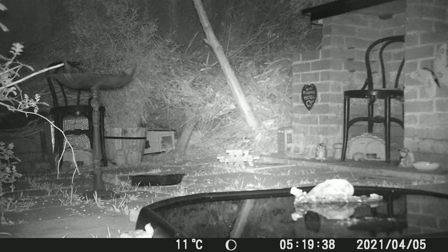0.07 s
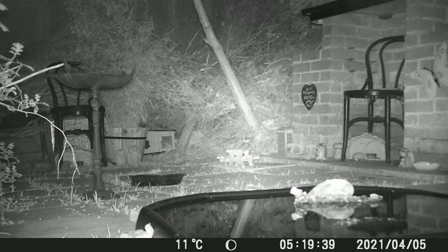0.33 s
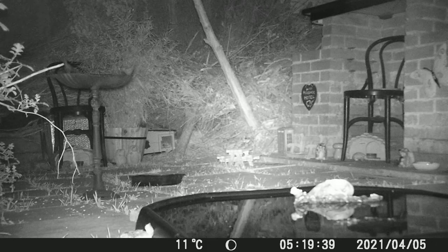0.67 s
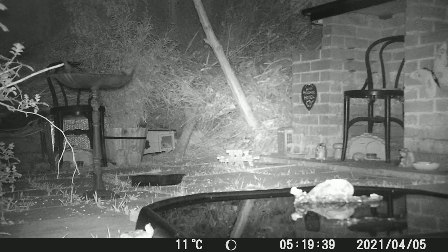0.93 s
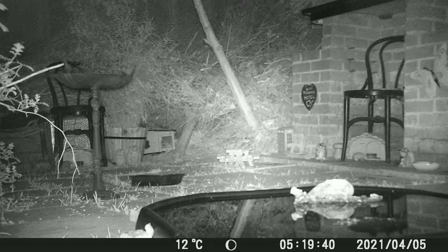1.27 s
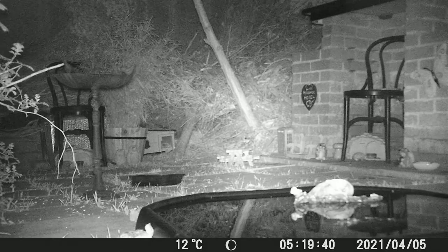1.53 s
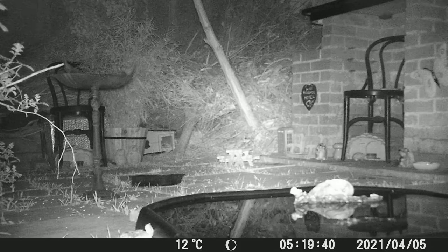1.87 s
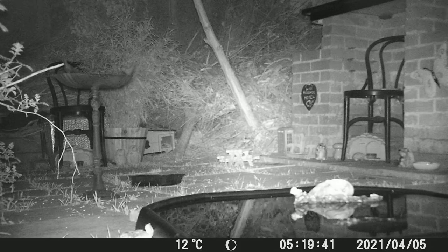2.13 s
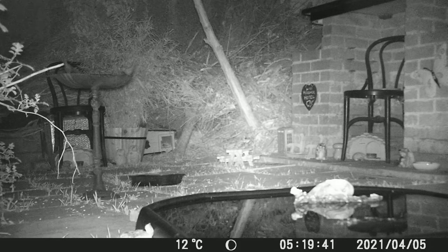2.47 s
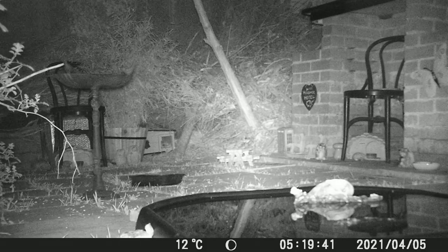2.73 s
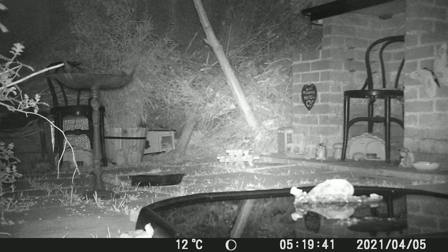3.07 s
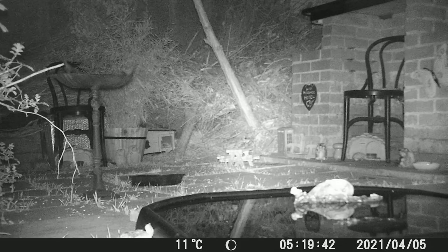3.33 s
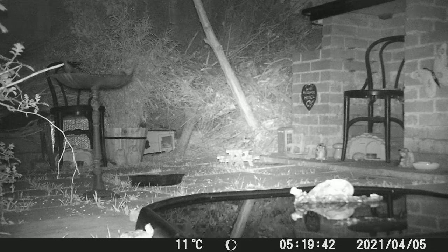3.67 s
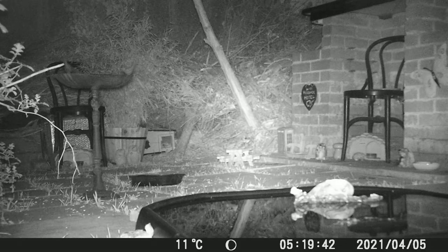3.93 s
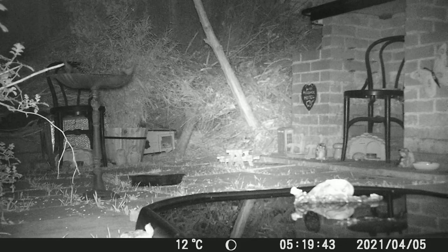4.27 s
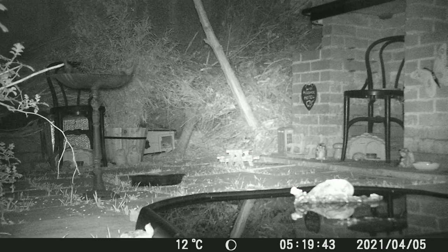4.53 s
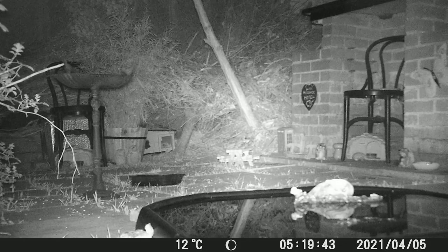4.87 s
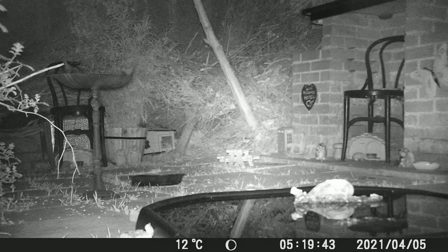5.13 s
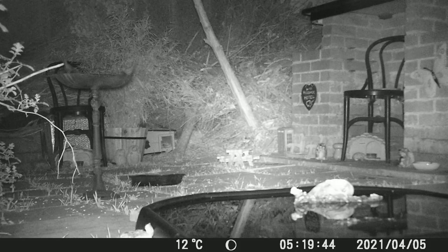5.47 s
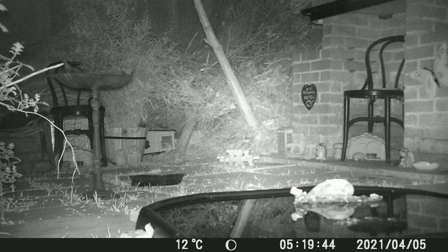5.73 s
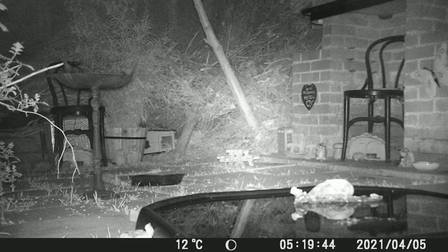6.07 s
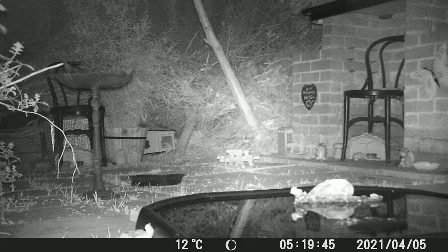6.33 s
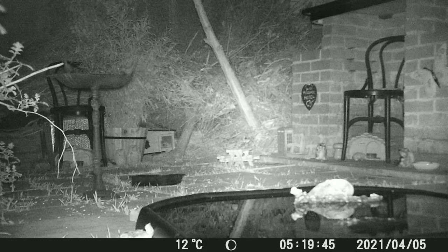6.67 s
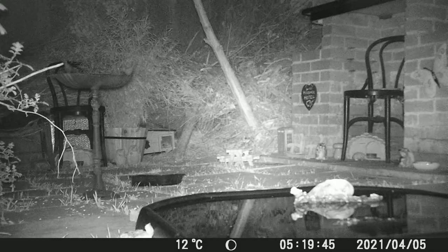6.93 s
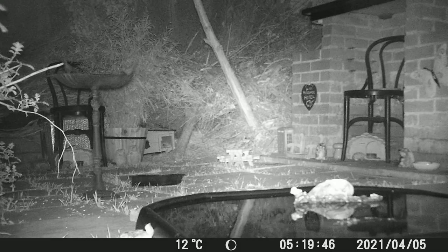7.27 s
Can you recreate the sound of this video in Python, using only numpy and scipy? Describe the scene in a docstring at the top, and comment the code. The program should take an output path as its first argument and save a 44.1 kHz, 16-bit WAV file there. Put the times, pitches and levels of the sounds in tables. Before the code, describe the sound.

Far-off wavering animal cries in a quiet night garden, with soft rhythmic thumping and hiss, followed by close bumps and rumbling on a plastic housing.

```python
"""An animal gives four long or short quavering wails, far off across a night garden; a wall echoes them.
The microphone sits in a small camera with a plastic housing, under a low murk of traffic and air.
Right beside it the electronics hiss and pulse five times a second with a low thump and a thin whine.
Later something unseen jostles the housing: it rumbles, rubs and takes dull knocks, all very close."""
import sys
import numpy as np
from scipy import signal
from scipy.fft import rfft, irfft, next_fast_len
from scipy.io import wavfile
from scipy.ndimage import uniform_filter1d, map_coordinates

SR = 44100
rng = np.random.default_rng(int(sys.argv[2]) if len(sys.argv) > 2 else 0)


def dump(signal):
    """Clip the signal to [-1, 1] and save it as 16-bit WAV at the path in sys.argv[1]."""
    limited = np.clip(np.atleast_2d(signal).T, -1, 1)
    pcm = np.round(limited * 32767).astype(np.int16)
    wavfile.write(sys.argv[1], SR, pcm)


N = 330750

# spectrum of far traffic and moving air: f/Hz, relative level/dB
NIGHT_SPECTRUM = [(8, -0.5), (22, -4.5), (45, -11), (75, -21), (90, -20), (101, -19), (115, -23.5),
                  (160, -37.5), (210, -31.5), (260, -36), (370, -37), (550, -52.5), (900, -56),
                  (2000, -77.5)]
# spectra of the electronics' hiss and thump: f/Hz, relative level/dB
HISS_SPECTRUM = [(200, 1), (700, -4), (1100, 0), (2100, -3), (3200, -7.5), (4800, -15), (5600, -14),
                 (6800, -10.5), (7800, -13), (8500, -24)]
THUMP_SPECTRUM = [(10, -6.5), (28, 10.5), (48, -11.5), (75, -16), (105, -21.5), (160, -36), (350, -34),
                  (600, -55.5), (1500, -60.5)]
# resonances of the hollow housing around the microphone: f/Hz, width/Hz, gain/dB
HOUSING_MODES = [(114.8, 10, 9.5), (205, 28, -5), (320.5, 101.4, -1), (399, 39.2, 3.5), (524.7, 39, -6.5),
                 (591, 35, -11.5), (800, 27, -23.5), (931, 37, -7), (1040, 38, -7), (1155, 34, -16),
                 (1263, 67, -17), (1500, 38, -28), (1595, 52, -18.5), (1700, 140, -19.5), (1857, 38, -18.5),
                 (2060, 62, -20.5), (2190, 140, -22), (2680, 63, -33), (2870, 380, -33.5)]
# spectra of the housing's slow sway and quick shudder: f/Hz, relative level/dB
SWAY_SPECTRUM = [(5, -7), (10, 5), (20, -2), (32, -8.5), (45, -17.5), (70, -45.5)]
SHUDDER_SPECTRUM = [(22, -31), (41, 0.5), (57, -5), (76, -17), (100, -18), (118, -33), (150, -58),
                    (220, -78.5)]
# shoves against the housing, each at its peak: t/s, sway/dB, shudder/dB
SHOVE_PEAKS = [(4.63, -29, -42.5), (4.8, -44.5, -28), (4.9, -26.5, -35), (5.07, -26.5, -31),
               (5.35, -26.5, -50.5), (5.64, -28.5, -35.5), (5.86, -26.5, -41), (6.1, -38, -37),
               (6.47, -34, -43.5), (6.66, -22.5, -37), (6.93, -29, -31.5), (7.16, -33.5, -33),
               (7.289, -30, -45)]
# course of the rubbing on the housing: t/s, relative level/dB
RUB_LEVELS = [(4.45, -75), (4.76, -81), (5.0, -76.5), (5.18, -66.5), (5.38, -79), (5.56, -74.5),
              (5.77, -64.5), (5.94, -63), (6.09, -67), (6.22, -64.5), (6.5, -68.5), (6.83, -60.5),
              (6.98, -58.5), (7.13, -65.5), (7.29, -68.5), (7.5, -58)]
# knocks on the housing: t/s, strength/dB, hardness of the contact/Hz
KNOCK_CONTACTS = [(3.119, -26, 700), (3.745, -23, 647), (3.874, -23, 900), (4.927, -29.5, 1600),
                  (5.232, -14, 1110), (5.253, -22, 700), (5.807, -22, 704), (5.909, 1, 1900),
                  (6.43, -24, 1090), (6.626, -2, 1200), (6.649, -8, 590), (6.663, -15, 2640),
                  (6.878, 0, 660), (6.915, -13, 800), (6.984, -18.5, 920), (7.002, -14.5, 680),
                  (7.104, -20, 686), (7.392, -23.5, 800), (7.445, -23, 680), (7.460, -18, 1450)]
# the arch of each wail, one list a call: t/s, f/Hz, relative level/dB
WAIL_ARCHES = [
    [(.35, 1020, -69.5), (.56, 977, -82), (.67, 981, -78), (.71, 1005, -64.5), (.95, 1162, -71.5),
     (1.33, 1125, -62), (1.44, 966, -69), (1.49, 915, -85)],
    [(1.76, 1160, -74), (1.85, 1085, -69.5), (1.98, 1149, -63.5), (2.1, 1168, -76.5), (2.42, 1310, -77.5),
     (2.65, 1070, -69), (2.76, 1045, -70), (2.81, 1030, -81)],
    [(4.71, 1022, -78.5), (4.785, 1021, -63), (4.87, 970, -84)],
    [(5.78, 1103, -80), (5.84, 1110, -65.5), (6.03, 1091, -76), (6.1, 1145, -73.5), (6.13, 1130, -58.5),
     (6.2, 1080, -65), (6.24, 1025, -59.5), (6.27, 1000, -74), (6.33, 914, -81)],
]
# quaver of each wail: t of one crest/s, rate/Hz, depth/share of pitch, dip at a crest/dB (negative lifts)
WAIL_QUAVERS = [(1.078, 8.4, 0.02, 1), (2.314, 7.5, 0.025, -0.5), (4.785, 7.5, 0.019, -0.5),
                (5.97, 7.2, 0.023, -2)]
# the mouth, opening wide late in the second wail: t/s, overtone relative to the fundamental/dB
MOUTH_OVERTONE = [(1.2, -20), (2.0, -31), (2.2, -14.5), (2.57, -5.5), (2.68, -16.5), (4.7, -34.5)]
# notch of the microphone port: f/Hz, gain/dB
PORT_NOTCH = [(585, 0.5), (630, -13.5), (700, -4), (810, 0.5)]

CYCLE_S, BUSY_FROM_S, BUSY_TO_S = .2, .06, .125  # the camera's work cycle and the burst within it


def amp(db):
    """Decibels to gain."""
    return 10 ** (np.asarray(db) / 20)


def unit(x):
    """Scale to rms 1."""
    return x / np.sqrt(np.mean(x ** 2) + 1e-20)


def clock():
    """The time of every sample."""
    return np.arange(N) / SR


def curves(rows):
    """One value per sample for each column after the time."""
    times, *columns = np.transpose(rows)
    return [np.interp(clock(), times, column) for column in columns]


def gate(t, start, end, fade):
    """1 between start and end, with sloping edges."""
    return np.clip(np.minimum(t - start, end - t) / fade, 0, 1)


def wobble(rate):
    """A smooth random curve, rate knots a second."""
    return map_coordinates(rng.standard_normal(int(N * rate / SR) + 4), [clock() * rate])


def filtered(x, response):
    """x times a complex response of frequency."""
    size = next_fast_len(N + SR // 2)
    return irfft(rfft(x, size) * response(np.fft.rfftfreq(size, 1 / SR)), size)[:N]


def lowpass(x, edge_hz, order):
    """A causal low-pass."""
    return signal.sosfilt(signal.butter(order, edge_hz, fs=SR, output="sos"), x)


def noise(spectrum):
    """Noise of rms 1 coloured by points of f/Hz, level/dB."""
    f, db = np.transpose(spectrum)
    colour = lambda hz: amp(np.interp(np.log(hz + 1), np.log(f), db, right=-120))
    return unit(filtered(rng.standard_normal(N), colour))


def even(x, span_s):
    """Noise with its chance swells ironed out."""
    power = np.abs(uniform_filter1d(x ** 2, int(span_s * SR) + 1))
    return x / np.sqrt(power + 0.033)


def night(level_db=-48, drift_db=-0.95):
    """The bed of the garden: a low murk of far traffic and moving air."""
    return amp(level_db + drift_db * wobble(5.8)) * noise(NIGHT_SPECTRUM)


def whine(level_db=-87.0, pitch_hz=4990, flicker_db=4.0, waver_rad=0.55, sag_db_per_s=110):
    """A thin, unsteady tone from the circuit, its level sagging through each burst."""
    sag_db = sag_db_per_s * (clock() % CYCLE_S - BUSY_FROM_S)
    level = amp(level_db - sag_db + flicker_db * wobble(70))
    return level * np.sin(2 * np.pi * pitch_hz * clock() + waver_rad * wobble(70))


def electronics(thump_db=-43, hiss_db=-73, hiss_lift_db=1):
    """Beside the microphone, each burst of the work cycle thumps, whines and lifts the hiss a little."""
    in_cycle_s = clock() % CYCLE_S
    busy = gate(in_cycle_s, BUSY_FROM_S, BUSY_TO_S, fade=.008)
    thumping = gate(in_cycle_s, start=.052, end=.145, fade=.02)
    thump = amp(thump_db) * even(noise(THUMP_SPECTRUM), span_s=.16) * thumping
    return thump + busy * whine() + amp(hiss_db + hiss_lift_db * busy) * noise(HISS_SPECTRUM)


def housing(hz):
    """Response of the plastic shell around the microphone: damped resonances of alternating sign."""
    return sum((-1) ** k * amp(db) * 1j * hz * width / (mode_hz ** 2 - hz ** 2 + 1j * hz * width)
               for k, (mode_hz, width, db) in enumerate(HOUSING_MODES))


def shove(peak_s, rise_s=0.044, fall_s=0.047):
    """The brief swell of one shove, nearly symmetric about its peak."""
    t = clock() - peak_s
    return np.exp(-(t / np.where(t < 0, rise_s, fall_s)) ** 2 / 2)


def jostle(rest_sway_db=-36.5, rest_shudder_db=-49, shudder_trim_db=-1):
    """Every shove makes the housing sway and shudder above a steady unrest: a rumble at the microphone."""
    sway_power = amp(rest_sway_db) ** 2
    shudder_power = amp(rest_shudder_db) ** 2
    for peak_s, sway_db, shudder_db in SHOVE_PEAKS:
        swell = shove(peak_s)
        sway_power += (amp(sway_db) * swell) ** 2
        shudder_power += (amp(shudder_db) * swell) ** 2
    sway = np.sqrt(sway_power) * even(noise(SWAY_SPECTRUM), span_s=.07)
    shudder = np.sqrt(shudder_power) * even(noise(SHUDDER_SPECTRUM), span_s=.09)
    return sway + amp(shudder_trim_db) * shudder


def rubbing(gain_db=2, grain_db=2, soft_hz=900):
    """Uneven rubbing, right on the shell, sounds its resonances."""
    slips = rng.standard_normal(N) * amp(grain_db * wobble(60))
    shell = lowpass(filtered(slips, housing), soft_hz, order=2)
    return amp(curves(RUB_LEVELS)[0] + gain_db) * unit(shell)


def knocks(gain_db=11, scrape_db=-29, scrape_t60=.06, dull_hz=3000):
    """Each contact is a push and a brief scrape; softer ones reach mainly the shell's low modes."""
    t = np.arange(SR // 8) / SR
    force = np.zeros(N + SR)
    for start_s, db, hard_hz in KNOCK_CONTACTS:
        push = t == 0
        scrape = amp(scrape_db - 60 * t / scrape_t60) * rng.standard_normal(len(t))
        blow = lowpass(push + scrape, hard_hz, order=2)
        force[round(start_s * SR):][:len(t)] += amp(db + gain_db) * blow
    return lowpass(filtered(force[:N], housing), dull_hz, order=6)


def mount(gain_db=-25, pitch_hz=100, t60=0.2, attack_s=.01, softness_db_per_octave=3.0):
    """Each knock sets the whole camera bobbing briefly on its mount; softer contacts push it more."""
    t = np.arange(SR // 2) / SR
    bob = np.sin(2 * np.pi * pitch_hz * t) * amp(-60 * t / t60) * (1 - np.exp(-t / attack_s))
    softest_hz = min(hz for _, _, hz in KNOCK_CONTACTS)
    motion = np.zeros(N + SR)
    for start_s, db, hard_hz in KNOCK_CONTACTS:
        loss_db = softness_db_per_octave * np.log2(hard_hz / softest_hz)
        motion[round(start_s * SR):][:len(t)] += amp(db + gain_db - loss_db) * bob
    return motion[:N]


def garden(direct, wall_s=0.029, wall_db=-15, hedges_db=-15, t60=0.94):
    """On the way to the microphone a brick wall answers once and hedges scatter a short tail."""
    t = np.arange(SR) / SR
    tail = rng.standard_normal(SR) * amp(-60 * t / t60) * (t > .012)
    hedges = signal.fftconvolve(direct, tail / np.linalg.norm(tail))[:N]
    wall = np.interp(clock() - wall_s, clock(), direct)
    return direct + amp(wall_db) * wall + amp(hedges_db) * hedges


def wail(arch, quaver, jitter=0.007, rasp=0.046, flutter_db=3.0):
    """A nearly pure voice quavers along its arch; an open mouth adds an overtone and a rasp."""
    crest_s, rate_hz, depth, dip_db = quaver
    pitch_hz, effort_db = curves(arch)
    swing = np.cos(2 * np.pi * rate_hz * (clock() - crest_s))
    overtone = amp(curves(MOUTH_OVERTONE)[0])
    roughness = (jitter + rasp * overtone) * wobble(170)
    phase = 2 * np.pi * np.cumsum(pitch_hz * (1 + depth * swing + roughness)) / SR
    voice = np.sqrt(2) * (np.sin(phase) + overtone * np.sin(2 * phase))
    calling = gate(clock(), start=arch[0][0], end=arch[-1][0], fade=.01)
    air_db = flutter_db * wobble(55)  # the air in between makes the level flutter
    return voice * calling * amp(effort_db - dip_db * swing + air_db)


def wails(gain_db=-1.0):
    """The animal's calls, one after another, far from the microphone."""
    return amp(gain_db) * sum(wail(arch, quaver) for arch, quaver in zip(WAIL_ARCHES, WAIL_QUAVERS))


def scene(jostle_from_s=4.45):
    """One microphone in the garden: far wails over the night air, the camera's own sounds close by."""
    handling = (jostle() + rubbing()) * gate(clock(), jostle_from_s, np.inf, fade=.16)
    far = garden(wails()) + night()
    close = knocks() + mount() + handling + electronics()
    return (far + close)[None]


def record(dry, top_hz=8500):
    """The microphone port swallows one narrow band; nothing passes above the band limit."""
    port = lambda hz: amp(np.interp(hz, *np.transpose(PORT_NOTCH)))
    return filtered(dry[0], lambda hz: port(hz) * (hz < top_hz))[None]


dry = scene()
out = record(dry)
dump(out)
```